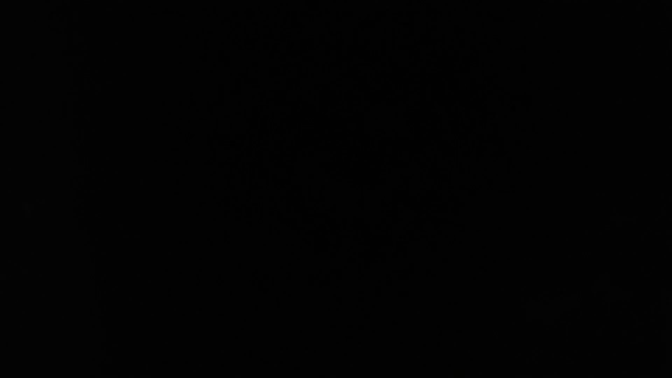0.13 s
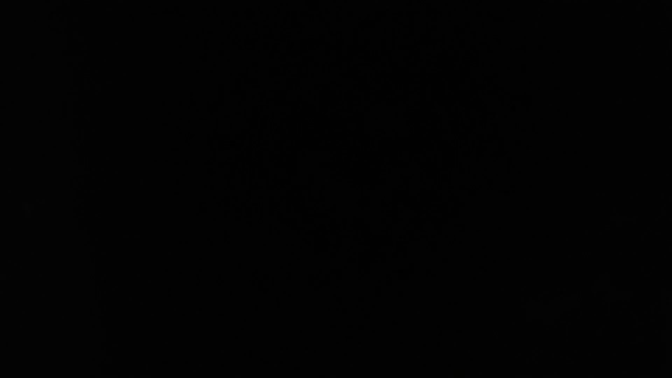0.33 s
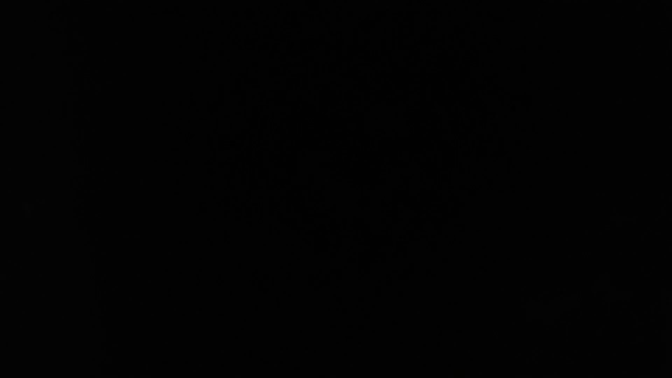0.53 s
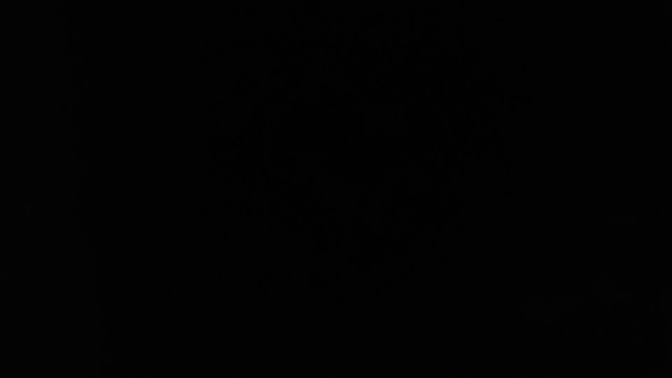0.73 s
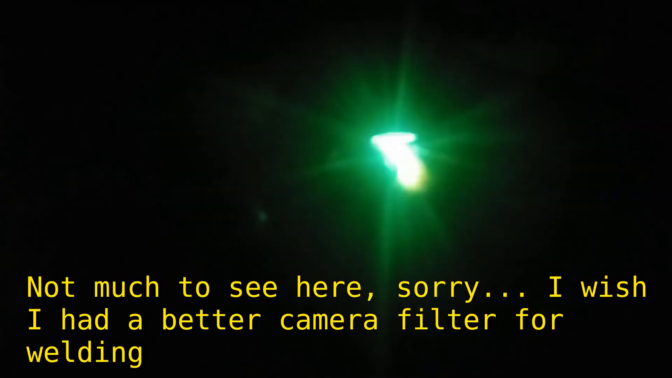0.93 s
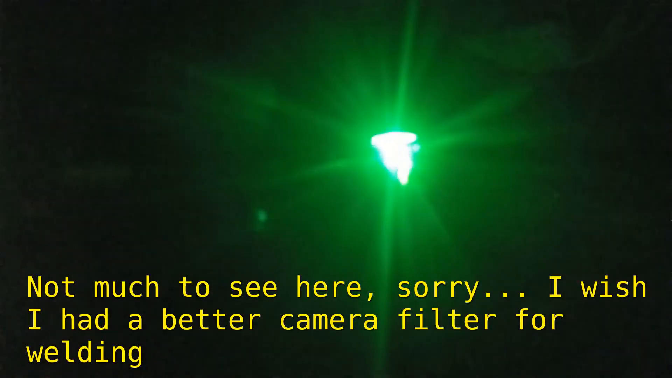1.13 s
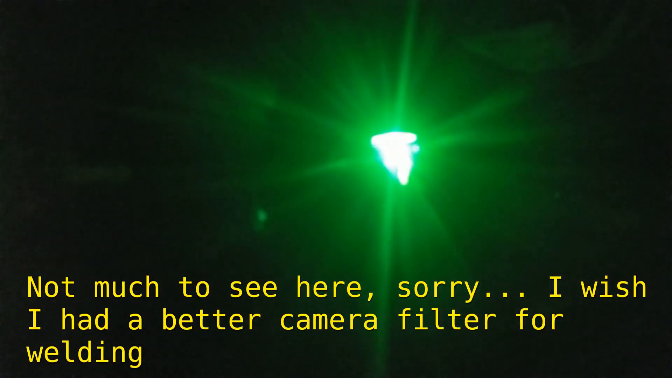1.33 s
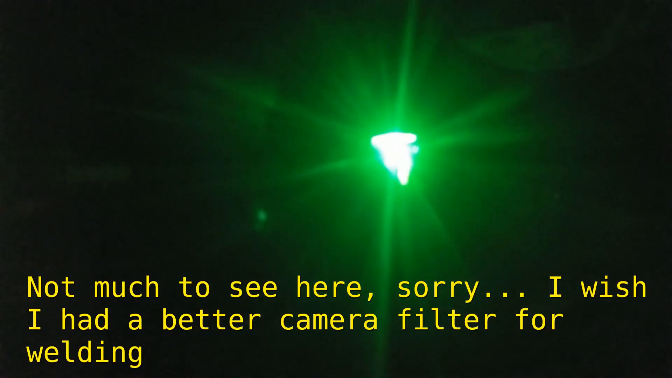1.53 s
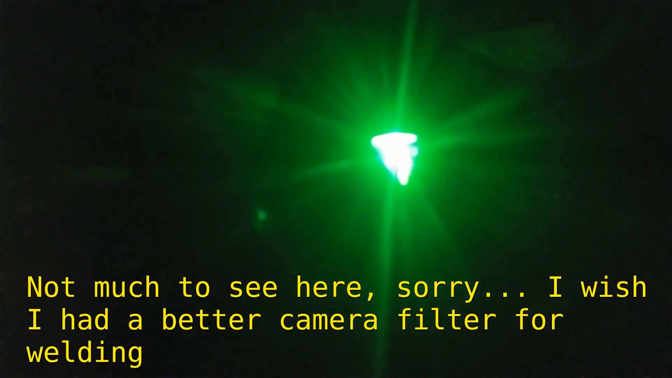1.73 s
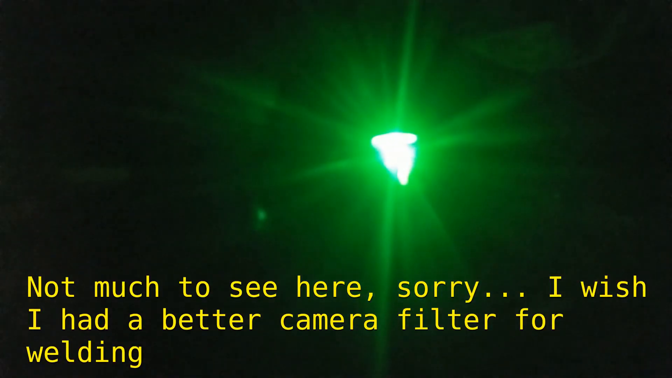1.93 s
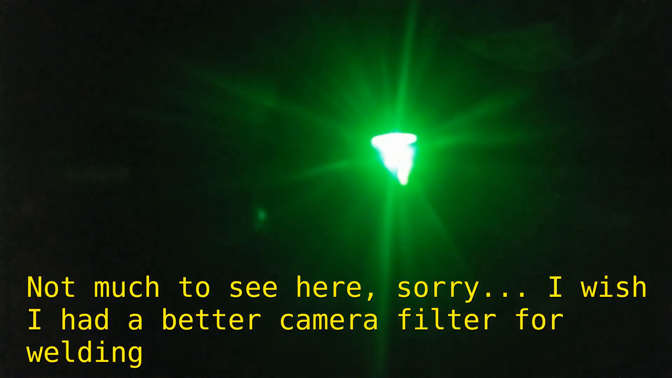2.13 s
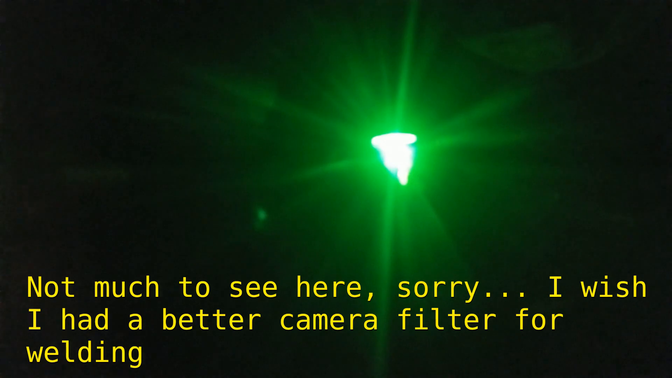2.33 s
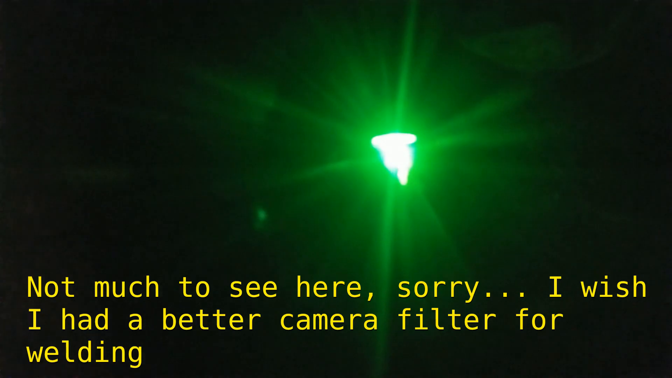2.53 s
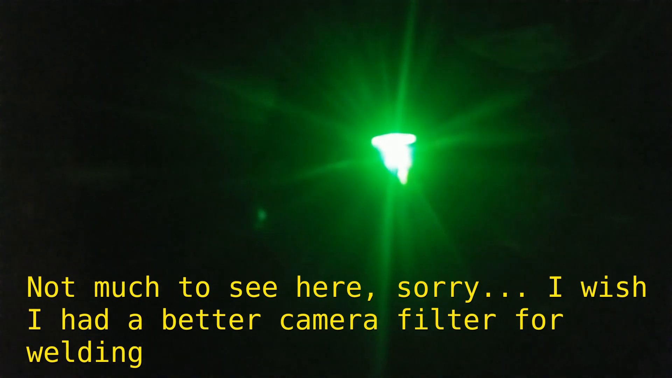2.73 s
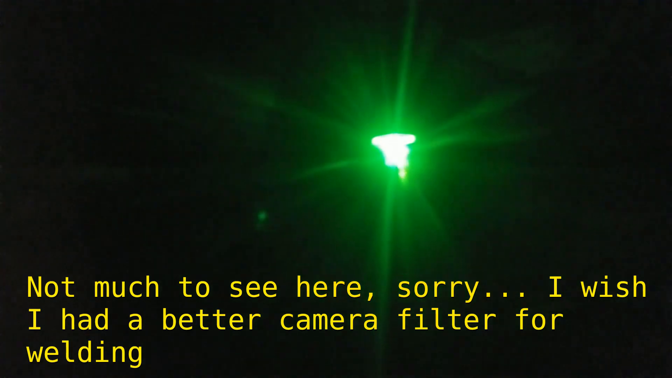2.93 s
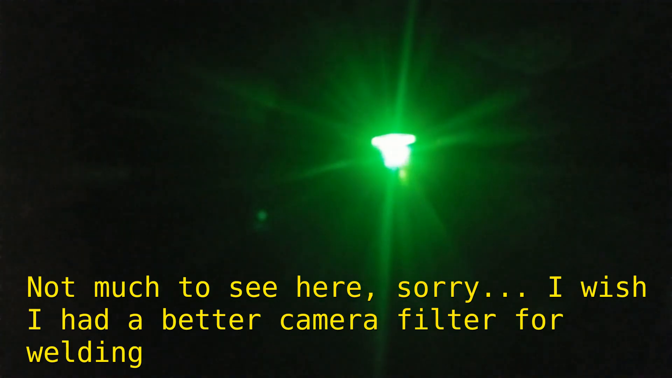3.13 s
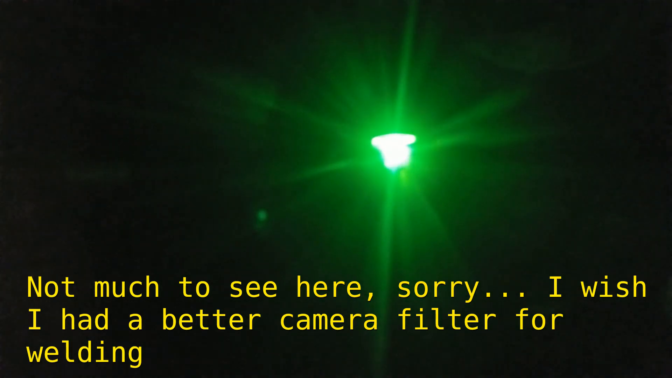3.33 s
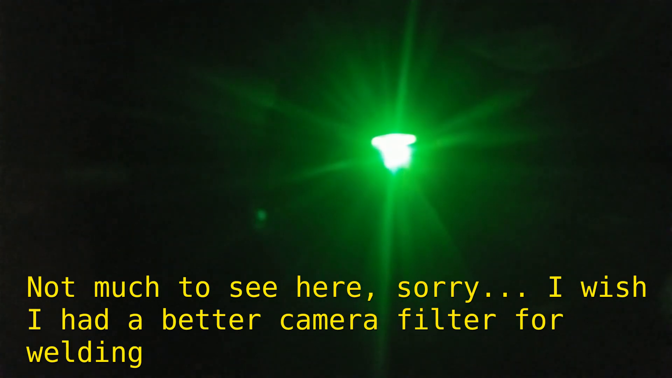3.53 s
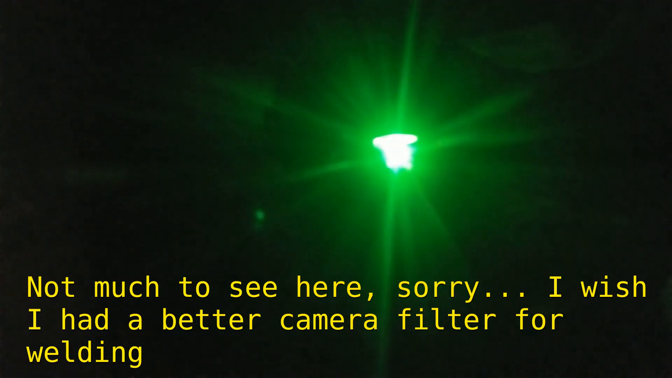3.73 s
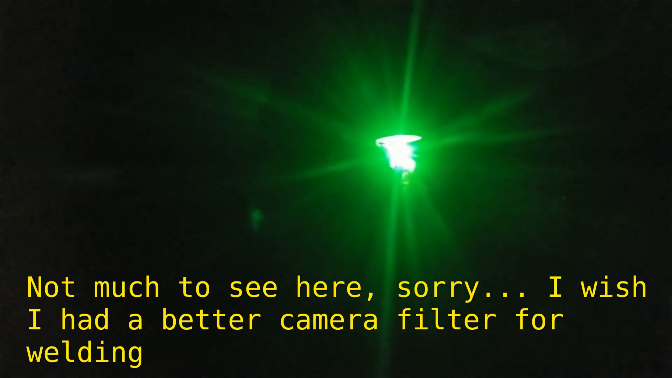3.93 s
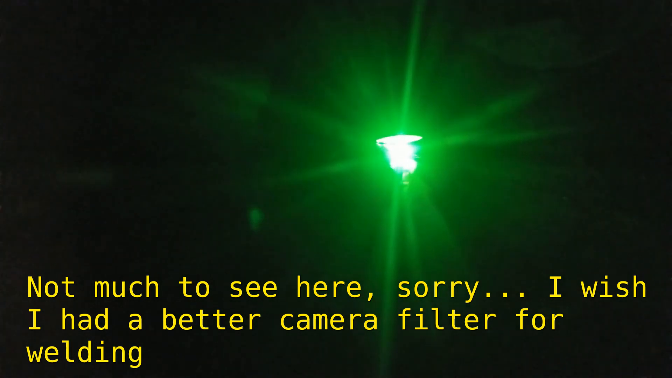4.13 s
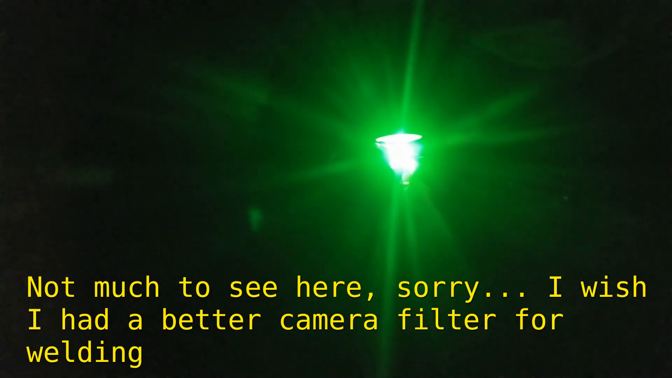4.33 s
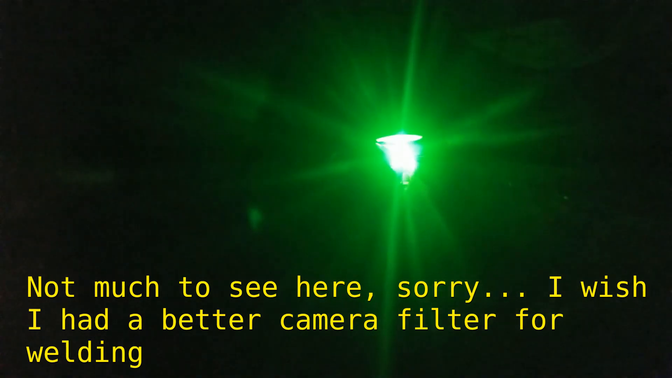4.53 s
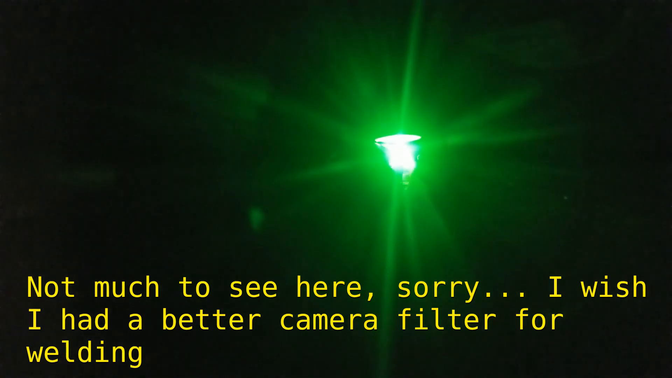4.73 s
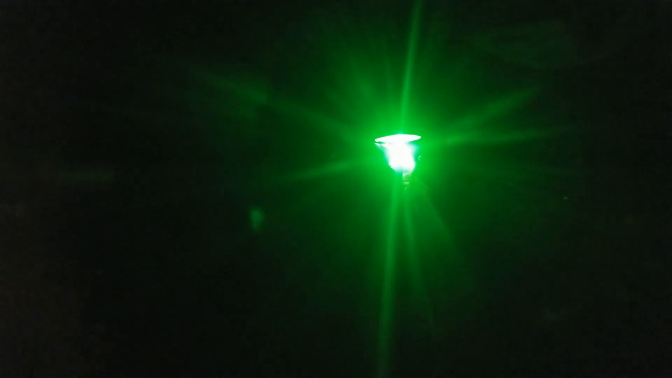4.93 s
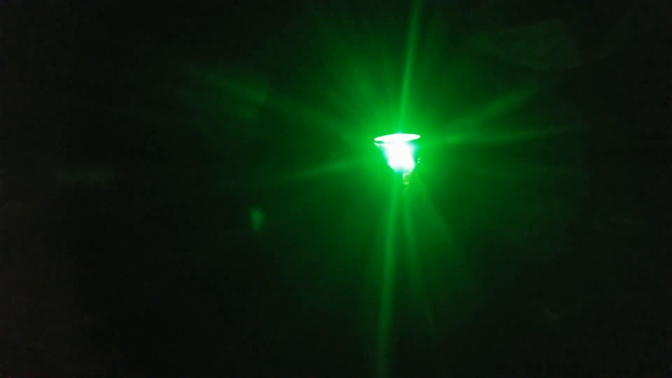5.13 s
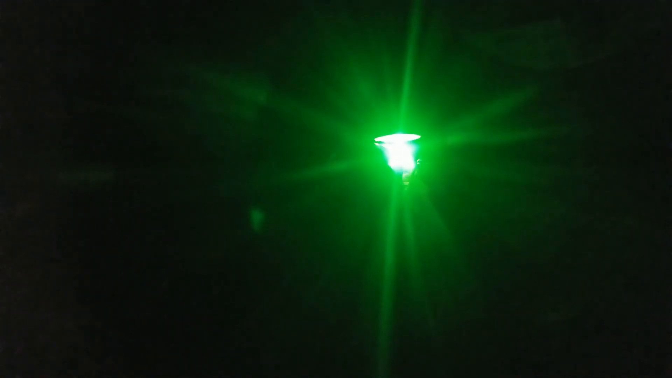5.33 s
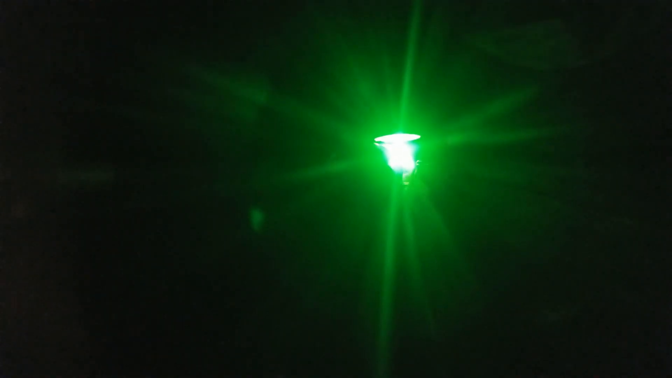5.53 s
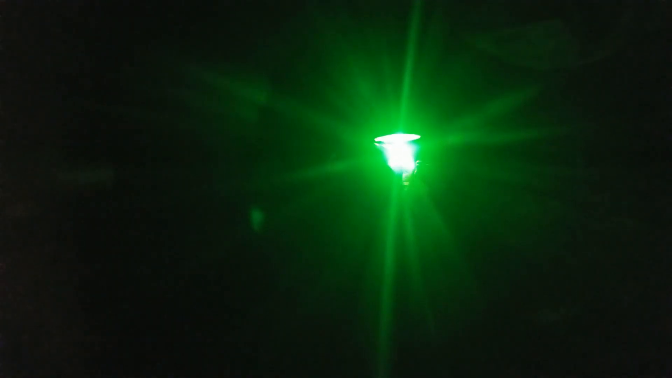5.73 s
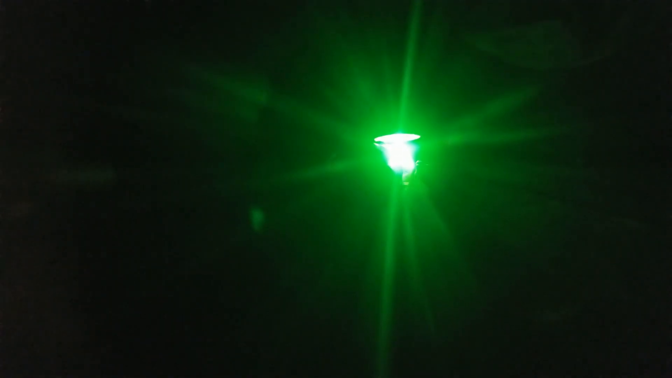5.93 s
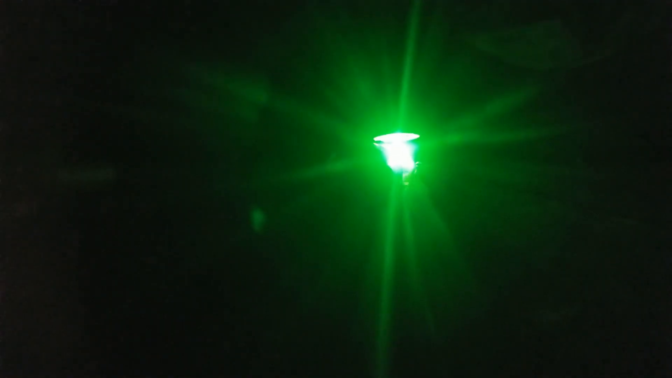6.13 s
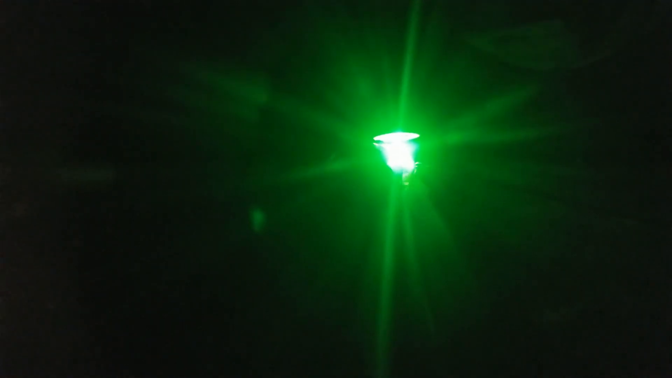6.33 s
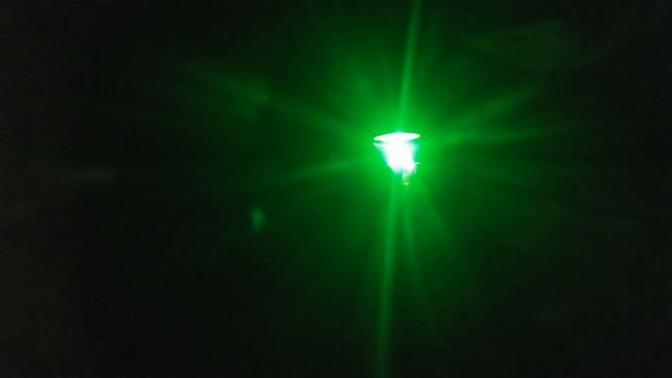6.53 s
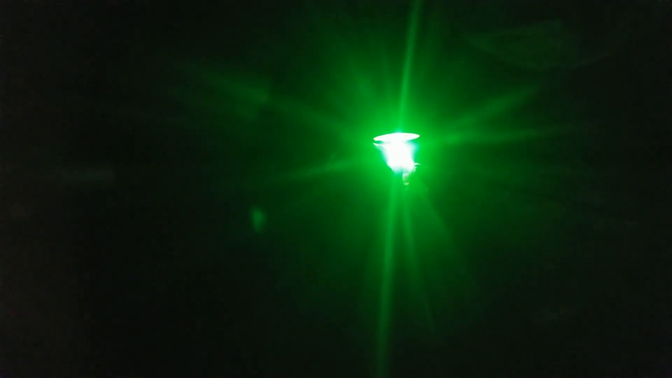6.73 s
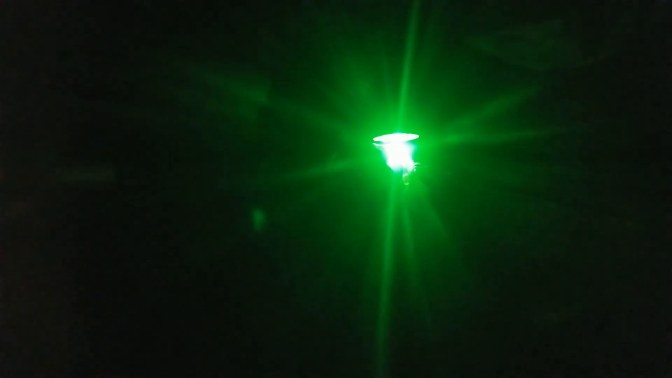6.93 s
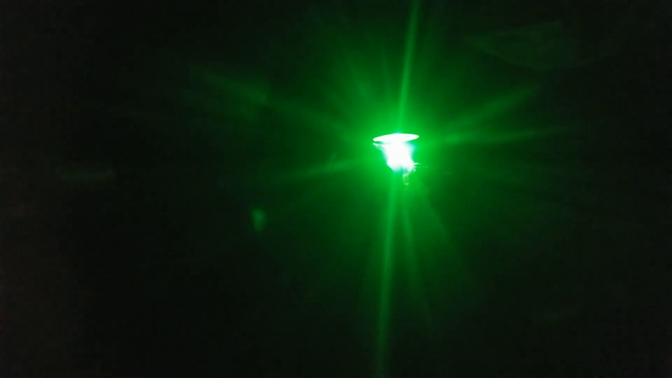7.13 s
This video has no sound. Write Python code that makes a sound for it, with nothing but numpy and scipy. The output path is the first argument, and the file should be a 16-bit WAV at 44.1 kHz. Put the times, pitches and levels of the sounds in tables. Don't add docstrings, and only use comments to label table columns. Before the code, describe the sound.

Close to a small stereo camera microphone in a shop, fan noise drones softly. One sharp pop with a brief puff of gas fails; a quarter second later a hard click and bassy thump start the weld. The fan drops back as gain ducks. Thin fizzing sputters in broken bursts with dry ticks, then a strong sizzling treble hiss takes over, with faint whistling and whining, scattered snaps, and the fan slowly returning.

```python
import sys
import numpy as np
from scipy import signal
from scipy.fft import rfft, irfft, next_fast_len
from scipy.io import wavfile
from scipy.ndimage import uniform_filter1d

SR = 44100
rng = np.random.default_rng(int(sys.argv[2]) if len(sys.argv) > 2 else 0)


def amplitude_ratio(level_db):
    exponent = np.asarray(level_db, float) / 20
    return 10 ** exponent


def file_out(sig):
    cols = np.atleast_2d(sig).T
    lim = np.clip(cols, -1, 1)
    pcm = np.round(lim * 32767).astype(np.int16)
    wavfile.write(sys.argv[1], SR, pcm)


N = 316197
RIPPLE_HZ = 120
RUSH_FROM_S, RUSH_TO_S = .6545, .923

# pitch_hz, right_db, left_db, left_lead_rad, likeness_0_to_1
SHOP_COLOUR = [(34.3, -27, -18, 1.5, 1), (155, -13, -11, 0.5, 0.94), (228, -8, -6, 0.28, 0.89),
               (420, -3, -1.5, 1.24, 0.58), (740, -9.5, -15.5, 0.68, 0.99), (1410, -13, -17, 5, 0.51),
               (1940, -18.5, -23, 2.5, 0.26), (3470, -19.5, -20.5, 9, 0.037), (6700, -32.5, -36, -6.5, 0.1),
               (8300, -32, -62, -6, .1), (9600, -38.5, -61, 5, .1), (10500, -39, -43, 12, .1),
               (12600, -35, -40, 5, .1), (15800, -47, -40, 26, .1)]
# pitch_hz, width_hz, level_db
FAN_CASING = [(216, 40, 10), (355, 50, 5), (465, 50, 6), (535, 60, -4), (640, 50, 5), (765, 50, 3),
              (1041, 25, 9)]
# time_s, level_db (at 170-590 Hz)
SHOP_LEVEL = [(0.0, -47.5), (0.54, -47), (0.8, -47), (0.94, -49), (1.02, -60), (2.16, -60.5), (2.48, -57.5),
              (3.15, -55.5), (3.41, -53), (3.85, -50), (4.53, -50.5), (5.29, -49.5), (5.67, -49.5),
              (5.89, -48.5), (7.17, -49.5)]
# centre_s, length_s, pitch_hz, level_db
RUMBLES = [
    (0.072, 0.042, 110, -52.5),
    (0.283, 0.076, 187, -49),
    (0.45, 0.03, 184, -43),
    (3.77, 0.097, 95, -59),
    (7.148, .04, 60, -66),
]

# time_s, pool_heat_0_to_1, mains_ripple_0_to_1, whine_db
WELD = [(.9, 0.05, 0.1, -73), (1.3, 0.01, 0.15, -58), (2.0, 0.01, 0, -53), (3.0, 0.06, 0.36, -46),
        (3.3, 0.78, 0, -52), (3.7, 1, 0.3, -54), (4.15, 0.97, 0.44, -42), (4.4, 0.99, 0.1, -56),
        (4.8, 1, 0.25, -47), (5.3, 1, 0, -51), (6.3, 1, 0, -50), (7.17, 0.95, 0.25, -43)]
# time_s, main_hz, upper_hz
WHINE_PITCH = [(1, 13770, 14890), (3.1, 13766, 14890), (3.5, 13720, 15015)]
# ripple_multiple, level_db
WHINE_SIDES = [(-1, -3.5), (1, -5.5), (2, -11), (-2, -9), (4, -12)]
WHINE_PORTS_DB = [
    [-5],
    [-2],
]
WHINE_HEAT_RISE_DB = [
    [0],
    [8],
]

# start_s, left_db, right_db, pulse_length_ms, pulse_shape_rad, rattle_db
STRIKES = [
    (.6655, -15.5, -9, .19, .15, -33),
    (.92763, -13.5, -12.5, .25, 1.75, -23),
    (2.2609, -50, -34, .8, 3.3, -60),
]
# start_s, level_db, pitch_hz, fall_60db_s
PUFFS = [
    (.9305, -9, 57, .05),
    (.6648, -12, 430, .007),
    (.6655, -24, 120, .022),
    (2.2605, -36.5, 62, .065),
]

# low_hz, high_hz
BANDS_HZ = [(1200, 2500), (5200, 7500), (11000, 15500)]
# pitch_hz, right_db, left_db, left_lead_rad, likeness_0_to_1
COLD_FIZZ = [(520, -10, -10, -.1, .5), (1210, -5, -12, .5, .7), (1890, -6, -4, 0, .9),
             (2300, -8, -10, .2, .8), (2760, -14, -15, 0, .7), (3000, -9, -11, .1, .95),
             (3270, -8.5, -13, -.4, .6), (3450, -8.5, -18, 2.5, .5), (3750, -9, -12.5, 3, .6),
             (3960, -10, -9.5, 2.3, .3), (4250, -9, -8, 1.9, .6), (4500, -11, -8, 2.7, .7),
             (4750, -11, -6, 5.3, .3), (5000, -8.5, -6, 6.2, .95), (5300, -6, -5, 6.3, 1),
             (5750, -6, -7.5, 7, .75), (6370, 0, -2, 6.7, .9), (6750, -2, -6, 6.8, .85),
             (7410, -7.5, -21, 7.6, .4), (7900, -6.5, -21, 7.9, .7), (8270, -8, -28, 7.8, .4),
             (8790, -16, -38, 10.2, .1), (9130, -18, -19, 7.5, .4), (9470, -7, -19, 8.2, .6)]
HOT_FIZZ = [(520, -1, -2, -.3, .4), (1030, -6, -12, .1, .4), (2070, -6, -6, -.1, .9),
            (2420, -10, -11, .3, .2), (2600, -10.5, -12, 0, .7), (2740, -13, -15, 1.5, .1),
            (3000, -9, -12.5, 0, .7), (3270, -7.5, -14, -.2, .5), (3500, -7, -17.5, 2.6, .25),
            (3800, -9, -14.5, 3.1, .6), (3930, -13, -14, 3.1, .7), (4060, -13.5, -15, 1.5, .1),
            (4520, -14.5, -12.5, 2.8, .6), (4760, -18, -16, 3.14, .95), (4900, -18, -14, 4.4, .1),
            (5020, -16, -14, 6.1, .4), (5180, -10, -10, 6.28, .95), (5500, -10, -10, 6.3, 1),
            (5780, -13.5, -13.5, 6.3, 1), (6080, -7.5, -8.5, 6.3, 1), (6720, -5, -7, 6.4, .8),
            (7410, -7, -12, 5.9, .6), (7750, -4, -27, 7.6, .1), (8100, -1, -25, 7.7, .4),
            (8440, -1, -18, 8.2, .6), (8960, -4, -25, 7.4, .2), (9470, -10, -18, 3.8, .5)]
COLD_HISS = [(9130.0, -22.0, -27.0, 1.2, 0.4), (9820.0, -17.0, -28.0, 2.2, 0.4),
             (10850.0, -11.0, -17.0, 3.0, 0.8), (11100.0, -9.0, -17.5, 3.0, 0.8),
             (11400.0, -12.5, -21.0, 3.0, 0.6), (11890.0, -7.0, -22.0, 3.0, 0.3),
             (12400.0, -5.0, -16.0, 4.3, 0.8), (12580.0, 0.0, -11.0, 4.1, 0.9),
             (12750.0, 0.0, -12.0, 4.1, 0.9), (13260.0, -7.0, -20.0, 4.9, 0.6),
             (13780.0, -13.0, -17.0, 6.0, 0.7), (14350.0, -22.0, -23.0, 7.6, 0.4),
             (14870.0, -9.0, -21.0, 8.8, 0.6), (15330.0, -14.0, -18.0, 9.4, 0.6),
             (15680.0, -10.0, -17.0, 9.2, 0.8), (15770.0, -22.0, -30.0, 9.2, 0.8),
             (15850.0, -26.0, -34.0, 9.2, 0.8)]
HOT_HISS = [(9130, -24, -37, -1.6, .2), (9470, -24, -29, -3.1, .4), (9800, -25, -28, -3.1, .75),
            (10200, -26, -28, -2.8, .5), (10510, -20, -33, -4.6, .35), (10800, -15, -26, -4.2, .75),
            (11200, -10, -20, -3.9, .9), (11500, -12, -22, -4, .9), (11750, -17, -27, -4.6, .6),
            (12000, -10, -26, -2.5, .4), (12400, 0, -16, -2.6, .8), (12720, -7, -14, -2.8, .95),
            (13150, -3, -16, -2.9, .95), (13780, -3.5, -14, -2.3, .95), (14250, -11.5, -22.5, -1.7, .8),
            (14600, -18, -24, -1.4, .7), (14990, -17, -19, -1.3, .75), (15300, -22.5, -25, -1.6, .5),
            (15680, -23, -26.5, -1.3, .3), (15850, -30, -33, 0, .2)]
GAS_START = [(690, -5, -9, .6, .6), (1150, -12, -20, 2.4, .2), (1900, -14, -17, -.4, .5),
             (2400, -14, -15, .5, .3), (2750, -17, -15, .1, .4), (3220, -10, -14, -.1, .6),
             (3700, -14, -15, -3, .6), (4360, -25, -15, -4, .3), (4750, -22, -13, -6, .3),
             (5100, -16, -14, -6.28, 1), (5500, -12, -12.5, -6.1, .9), (6300, -12, -15.5, -5.7, .85),
             (6890, -5.5, -14, -5.6, .7), (7500, -7, -27, -4.8, .3), (8040, -9.5, -27, -4.6, .5),
             (8600, -10, -39, -4.5, .3), (9190, -11, -23, -4, .2), (9600, -12, -26, -2.7, .3),
             (10110, -17, -23, -2.7, .3), (10700, -13, -19, -3.5, .5), (11500, -7, -17, -3, .75),
             (11940, 0, -13, -2.9, .8), (14240, -11, -17, 0, .5), (15390, -3, -15, 2.8, .4),
             (15850, -8, -20, 3, .7)]
# pitch_hz, width_hz, level_db
COLD_DIPS = [(12680, 350, -4), (13750, 500, -6)]
HOT_DIPS = [(12480, 400, -4.5), (13780, 500, -5)]
# pitch_hz, width_hz, level_db
BLAST_CUP = [(10800, 500, 8), (11900, 500, -8), (12800, 900, 9), (14600, 900, 3)]
RUSH_CUP = [(10000, 900, -1), (11700, 350, 3), (12500, 500, -4), (13350, 500, 4), (15500, 400, 2)]
# time_s, hiss_db
BURN = [(.93, -38), (1.0, -40), (1.23, -47.5), (1.55, -44.5), (2.2, -51), (2.8, -40.5), (3.1, -46),
        (3.25, -44.5), (3.35, -41), (3.6, -40.5), (3.7, -37.5), (4.1, -36), (4.3, -38), (4.6, -36.5),
        (4.82, -37.5), (5.4, -35), (6.0, -35), (7.17, -35)]
# start_s, length_s, first_db, last_db
SPELLS = [(0.634, .003, -58, -60), (.643, .011, -66, -64), (0.925, 0.071, -41.5, -58),
          (0.995, 0.18, -55, -55), (1.188, 0.033, -56, -48.5), (1.226, 0.031, -60, -62),
          (1.56, 0.044, -48.5, -57), (1.615, 0.088, -54.5, -57), (1.702, 0.16, -49.5, -57.5),
          (1.868, 0.22, -57, -51.5), (2.095, 0.13, -57.5, -57), (2.219, 0.19, -55.5, -47),
          (2.412, 0.26, -53, -44), (2.675, 0.09, -44, -48), (2.768, 0.017, -50, -54),
          (2.796, 0.062, -54.5, -60), (2.883, .02, -62, -52), (2.906, 0.088, -43, -51),
          (2.996, 0.061, -50.5, -55.5), (3.059, 0.027, -57, -70), (3.623, 0.037, -61, -54.5),
          (5.172, .25, -56, -70), (5.546, 0.12, -62, -60), (5.922, 0.025, -54, -50),
          (6.03, 0.026, -55, -59), (6.264, 0.029, -56, -53), (6.298, 0.022, -50.5, -48),
          (6.32, 0.044, -54, -56), (6.42, 0.047, -54, -54), (6.47, .03, -55, -62),
          (6.741, 0.13, -47.5, -55), (6.863, 0.15, -59, -51), (7.003, 0.156, -48.5, -44.5)]
# sputter_db, fizz_db, hiss_db
BURN_COLD_DB = (-23, -13.5, -4.5)
BURN_HOT_DB = (-27, -13.5, -2.5)
SPELL_COLD_DB = (0.1, 3.5, 4)
SPELL_HOT_DB = (-0.4, 0, -1)
# sputter_db, fizz_db, hiss_db; the fall is in dB per second
BLAST_DB = (-42.5, -50, -24)
RUSH_DB = (-49, -39.5, -32.5)
RUSH_FALL_DB_S = (49, 55, 79)
# start_s, peak_db
TICKS = [(.6656, -20), (.6735, -25), (.9272, -32), (.9346, -21.5), (.9383, -27), (.9427, -19), (.948, -33),
         (.998, -33), (1.0494, -34), (1.0744, -29), (1.092, -26), (1.112, -27), (1.139, -30), (1.16, -36),
         (1.171, -28), (1.1815, -35), (1.201, -28), (1.206, -28), (1.2132, -30), (1.2166, -28),
         (1.2425, -37), (1.251, -43), (1.2573, -34), (1.4075, -49), (1.432, -40), (1.4411, -34),
         (1.45, -36), (1.484, -49), (1.5515, -34), (1.5599, -19.5), (1.561, -31), (1.5676, -29),
         (1.5739, -25), (1.5792, -38), (1.5882, -38), (1.6577, -33), (2.0805, -39), (2.0914, -29),
         (2.1433, -29), (2.1653, -27), (2.186, -44), (2.232, -30.5), (2.6794, -31), (2.822, -37),
         (2.8285, -29), (2.8392, -42), (2.843, -39), (2.9095, -38), (2.917, -36), (2.9221, -34),
         (3.057, -50), (3.3261, -34.5), (3.8057, -33), (4.16, -33), (5.3227, -39), (6.462, -30),
         (6.7547, -33), (6.7761, -40), (6.822, -25), (7.147, -27)]
# start_s, peak_db
SNAPS = [(1.7924, -31), (2.0454, -14), (2.1242, -22), (2.4365, -13.5), (3.6442, -29), (5.1897, -18),
         (5.9327, -20), (5.9418, -25), (6.0425, -14), (6.3002, -29), (6.314, -29), (6.4279, -36),
         (6.7412, -31), (6.7986, -31), (7.0006, -28), (7.037, -36), (7.059, -17), (7.0989, -29)]
BOUNCE_SAMPLES = (23, 7, 7)
BOUNCE_KEEP = (0.11, 0.58, 0.32)

# pitch_hz, width_hz, level_db
SHADOW_LEFT = [(3350, 98, -27), (5046, 18, -26), (8100, 77, 2), (8940, 200, 2), (10350, 38, -21)]
SHADOW_RIGHT = [(4240, 44, 3), (4730, 56, 6.5), (9280, 81, -23)]
# pitch_hz, level_db
TROUGH_MUTE = [(2300, -11), (2750, -9), (3200, -12), (3700, -8), (3950, -5.5), (4300, -7), (4600, -6.5),
               (4780, -3.5), (5100, -13), (5750, -8), (8500, -15), (9200, -15), (10000, -14.5),
               (10400, -20)]


def level(x, lo_hz, hi_hz):
    sos = signal.butter(4, [lo_hz, hi_hz], "band", fs=SR, output="sos")
    band = signal.sosfilt(sos, x.mean(axis=0))
    return x / np.sqrt(np.mean(band ** 2))


def curves(table, before=None):
    s, *columns = np.transpose(table)
    return [np.interp(np.arange(N) / SR, s, c, left=before) for c in columns]


def walk(rate):
    k = int(SR / rate)
    steps = np.repeat(rng.standard_normal(N // k + 1), k)
    return 0.866 * uniform_filter1d(uniform_filter1d(steps, k), k)[:N]


def rings(modes):
    return lambda hz: amplitude_ratio(sum(db / (1 + (2 * (hz - f) / w) ** 2) for f, w, db in modes))


def ports(direct, diffuse, table, shape=lambda hz: 1):
    size = next_fast_len(N + 4096)
    hz = np.maximum(np.fft.rfftfreq(size, 1 / SR), 1)
    at, right_db, left_db, lead, like = np.transpose(table)

    def read(column, **ends):
        return np.interp(np.log(hz), np.log(at), column, **ends)

    like = np.clip(read(like), 0, 1)
    direct = rfft(direct, size)
    left = like * direct * np.exp(1j * read(lead)) + np.sqrt(1 - like ** 2) * rfft(diffuse, size)
    left = left * amplitude_ratio(read(left_db, left=-90, right=-90))
    right = direct * amplitude_ratio(read(right_db, left=-98, right=-90))
    return irfft(np.array([left, right]) * shape(hz), size)[:, :N]


def shop():
    t = np.arange(N) / SR
    shop_db = curves(SHOP_LEVEL)[0]
    air = rng.standard_normal((2, N)) * amplitude_ratio(1.0 * walk(11))
    hum = amplitude_ratio(-10 + .6 * walk(4.5)) * np.sin(2 * np.pi * np.cumsum(638 + 0.85 * walk(5.12)) / SR)
    hum = hum * amplitude_ratio(0.11 * (-46.5 - shop_db))
    blade = amplitude_ratio(-21.5 + 1.5 * walk(2.5)) * np.sin(2 * np.pi * 2087 * t)
    fan = level(ports(*air, SHOP_COLOUR, rings(FAN_CASING)), lo_hz=168, hi_hz=590)
    out = (fan + hum + blade) * amplitude_ratio(shop_db + 1)
    bass = signal.sosfiltfilt(signal.butter(2, 151, fs=SR, output="sos"), out)
    bass_db = 0.57 * (np.minimum(shop_db, -51) + 51.5) + 2 * walk(5.7)
    out = out + bass * (amplitude_ratio(bass_db) - 1)
    for s, length, hz, db in RUMBLES:
        sos = signal.butter(2, [1.01 * hz, 1.29 * hz], "band", fs=SR, output="sos")
        shake = signal.sosfilt(sos, rng.standard_normal(N))
        out = out + amplitude_ratio(db) * shake / shake.std() * np.exp(-((t - s) / length) ** 2)
    return out


def whine():
    heat, _, db = curves(WELD)
    hz, upper_hz = curves(WHINE_PITCH)
    t = np.arange(N) / SR
    phase = 2 * np.pi * np.cumsum(hz + 2.0 * walk(30)) / SR
    tone = np.sin(phase)
    for k, side_db in WHINE_SIDES:
        side = np.sin(phase + 2 * np.pi * k * RIPPLE_HZ * t)
        tone = tone + heat * amplitude_ratio(side_db + 2.0 * walk(3.8)) * side
    upper = np.sin(2 * np.pi * np.cumsum(upper_hz + 12 * walk(30)) / SR)
    tone = tone + amplitude_ratio(-13 + 9 * (1 - heat)) * upper
    tone = tone * amplitude_ratio(db + 2.0 * walk(6)) * (t > STRIKES[1][0])
    ports_db = np.array(WHINE_PORTS_DB) + np.array(WHINE_HEAT_RISE_DB) * heat
    return amplitude_ratio(ports_db) * np.array([np.roll(tone, 1), tone])


def strikes():
    out, t = np.zeros((2, N)), np.arange(N) / SR
    sos = signal.butter(2, [450, 2100], "band", fs=SR, output="sos")
    for s, left_db, right_db, ms, shape, rattle_db in STRIKES:
        u = (t - s) * 1000 / ms
        pulse = np.cos(u * np.pi / 2 + shape) * np.exp(-u ** 2 / 2)
        out += amplitude_ratio(np.array([[left_db], [right_db]])) * pulse
        rattle = signal.sosfilt(sos, rng.standard_normal((2, N)))
        dying = (t > s) * amplitude_ratio(-60 * np.abs(t - s) / 0.17)
        out += amplitude_ratio(rattle_db + 5.5) * rattle * dying
    for s, db, hz, fall_s in PUFFS:
        age = np.maximum(t - s, 0)
        swell = amplitude_ratio(db - 60 * (age / fall_s) ** 2) * (1 - np.exp(-age / 0.0021))
        out += swell * np.sin(2 * np.pi * hz * age) * np.array([[.08], [1]])
    return out


def discharges(share, spread_db, smear_s):
    sparks = (rng.random(N) < share) * amplitude_ratio(spread_db * rng.exponential(size=N))
    keep = np.exp(-1 / (smear_s * SR))
    strength = signal.lfilter([1 - keep], [1, -keep], sparks)
    return strength / strength.mean()


def band_gains(heat):
    t = np.arange(N) / SR
    spells = np.zeros(N)
    for s, length, first_db, last_db in SPELLS:
        count = int(length * SR)
        spells[int(s * SR):][:count] += amplitude_ratio(np.linspace(first_db, last_db, count)) ** 2
    spells = uniform_filter1d(spells, int(.004 * SR))

    def blend(cold, hot):
        return np.outer(cold, 1 - heat) + np.outer(hot, heat)

    power = amplitude_ratio(curves(BURN, before=-120)[0] + blend(BURN_COLD_DB, BURN_HOT_DB)) ** 2
    power += np.maximum(spells, 0) * amplitude_ratio(blend(SPELL_COLD_DB, SPELL_HOT_DB)) ** 2
    age = np.clip(t - RUSH_FROM_S, 0, 1)
    blast = amplitude_ratio(np.add.outer(BLAST_DB, -420 * np.abs(age - 0.0094)))
    rush = amplitude_ratio(np.array(RUSH_DB)[:, None] - np.outer(RUSH_FALL_DB_S, age))
    rushing = (t > RUSH_FROM_S) & (t < RUSH_TO_S)
    return np.sqrt(power + (blast ** 2 + rush ** 2) * rushing)


def singing(heat):
    cold_hz, hot_hz, wander_hz = 12645, 12415, 16
    wander = wander_hz * (.35 + heat) * (walk(4.4) + walk(60) + walk(300))
    phase = 2 * np.pi * np.cumsum(cold_hz + (hot_hz - cold_hz) * heat + wander) / SR
    phase = phase + np.array([[-2.4], [0]])
    side = np.sin(phase - 2 * np.pi * RIPPLE_HZ * np.arange(N) / SR)
    side = heat * amplitude_ratio(-4 + 3 * walk(4.5)) * side
    ports_db = np.array([[-15], [-1]]) + 3.5 * (1.5 - heat) + 2.9 * walk(7.8)
    return amplitude_ratio(ports_db) * (np.sin(phase) + side)


def upper(hz):
    return 1 / (1 + np.exp(np.clip((4100 - hz) / 250, -50, 50)))


def lower(hz):
    return (1 - upper(hz)) / (1 + (650 / hz) ** 4)


def top(hz):
    return upper(hz - 5000)


def middle(hz):
    return upper(hz) - top(hz)


def arc():
    t = np.arange(N) / SR
    heat, ripple, _ = curves(WELD)
    heat = np.clip(heat, 0, 1)
    first = t < RUSH_TO_S
    fresh = np.exp(-(np.clip(t - RUSH_FROM_S, 0, 1) / 0.036) ** 2)
    strength = discharges(share=.06, spread_db=1.2, smear_s=.0002)
    mains = np.cos(2 * np.pi * RIPPLE_HZ * t - .3 + .4 * walk(1.2))
    flicker = amplitude_ratio(0.91 * walk(24.7))

    click_s, click_db = np.transpose(np.concatenate([TICKS, np.add(SNAPS, [0, -12])]))
    at = (click_s * SR).astype(int)
    treble_db = click_db + np.repeat([2.5, -14], [len(TICKS), len(SNAPS)])

    layers = [(COLD_FIZZ, HOT_FIZZ, lower, lower, lower, .2, .6, click_db, 3),
              (COLD_FIZZ, HOT_FIZZ, middle, upper, upper, .4, .45, click_db, -1.5),
              (COLD_HISS, HOT_HISS, top, rings(COLD_DIPS), rings(HOT_DIPS), 1, .35, treble_db, 3)]
    out = 0
    gains = band_gains(heat)
    for layer, band, bounce, keep, gain in zip(layers, BANDS_HZ, BOUNCE_SAMPLES, BOUNCE_KEEP, gains):
        cold, hot, first_shape, cold_shape, hot_shape, depth, grain, peak_db, trim_db = layer

        def mix(x):
            cold_part = np.sqrt(1 - heat) * ports(*x, cold, cold_shape)
            return cold_part + np.sqrt(heat) * ports(*x, hot, hot_shape)

        def gas(x, cup):
            return level(ports(*x, GAS_START, lambda hz: first_shape(hz) * rings(cup)(hz)), *band)

        burn = (1 - grain + grain * strength) * (1 + depth * ripple * mains) * flicker
        burn = burn * rng.standard_normal((2, N))
        start = fresh * gas(burn, BLAST_CUP) + (1 - fresh) * gas(burn, RUSH_CUP)
        noise = np.where(first, start, level(mix(burn), *band))

        click = np.zeros((2, N))
        click[:, at] = amplitude_ratio(peak_db + trim_db - 7.5)
        click = signal.lfilter([1], np.r_[1, np.zeros(bounce - 1), -keep], click)
        click[1] = np.roll(click[1], 9)
        impulse = np.eye(1, N, N // 2).repeat(2, 0)
        unit = np.abs(ports(*impulse, cold, cold_shape).mean(axis=0)).max()
        out = out + gain * noise + mix(click) / unit
    return out + gains[2] * ~first * singing(heat)


def scene():
    return shop() + whine() + strikes() + arc()


def mute_masked(x):
    lead, top_hz, wide_hz = 758, 11000, 9640
    hz, s, cells = signal.stft(np.pad(x, [(0, 0), (lead, 0)]), SR, "cosine", nperseg=2048)
    span = ((hz > 2300) & (hz < top_hz))[:, None] & (s > RUSH_FROM_S)
    power = np.abs(cells) ** 2
    near = uniform_filter1d(power, size=7, axis=1)
    around = uniform_filter1d(power, size=91, axis=1)
    masked = near < around * amplitude_ratio(-7.5) ** 2
    left, right = cells * ~(masked & span)

    pair = np.array([left + right, left - right]) / 2
    power = uniform_filter1d(np.abs(pair) ** 2, size=2, axis=2)
    high, bins = hz > wide_hz, np.arange(len(hz))
    blocks = np.where(high, bins // 32 * 32 + 16 * (hz < top_hz), bins // 7 * 7 + 3)
    wide_band = uniform_filter1d(power, size=32, axis=1)
    narrow_band = uniform_filter1d(power, size=7, axis=1)
    band = np.where(high[:, None], wide_band, narrow_band)[:, blocks]
    around = uniform_filter1d(power.sum(axis=0), size=181, axis=0)
    trough_db = np.interp(hz, *np.transpose(TROUGH_MUTE))[:, None]
    trough_db = trough_db + 2.6 * rng.standard_normal(pair.shape)[:, blocks]
    under_partner = band < band[::-1] * amplitude_ratio(-8.5) ** 2
    in_trough = band < around * amplitude_ratio(trough_db) ** 2
    mid, side = pair * ~((under_partner | in_trough) & span)
    stereo = np.array([mid + side, mid - side])
    return signal.istft(stereo, SR, "cosine", nperseg=2048)[1][:, lead:lead + N]


def roll_off(x):
    return signal.sosfilt(signal.butter(12, 16050, fs=SR, output="sos"), x)


def record(dry):
    size = next_fast_len(N + 4096)
    hz = np.fft.rfftfreq(size, 1 / SR)
    shadows = np.array([rings(SHADOW_LEFT)(hz), rings(SHADOW_RIGHT)(hz)])
    shaded = irfft(rfft(dry, size) * shadows, size)[:, :N]
    return roll_off(mute_masked(shaded))


dry = scene()
out = record(dry)
file_out(out)
```